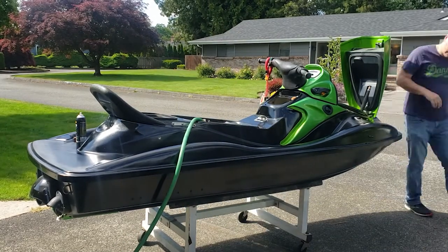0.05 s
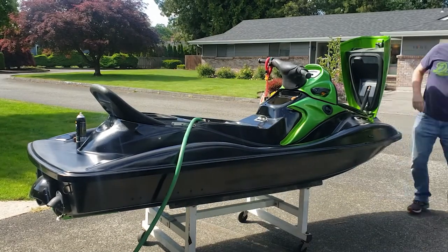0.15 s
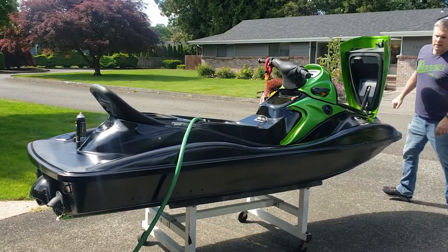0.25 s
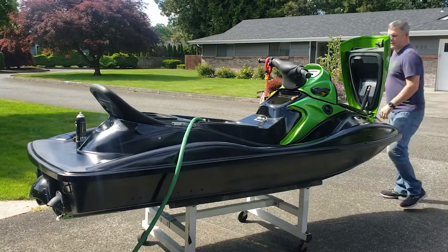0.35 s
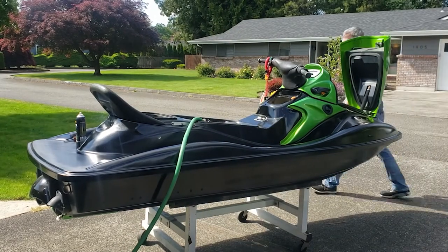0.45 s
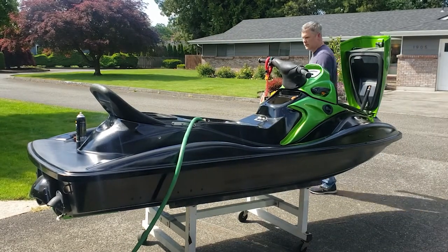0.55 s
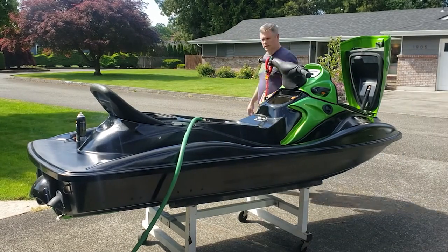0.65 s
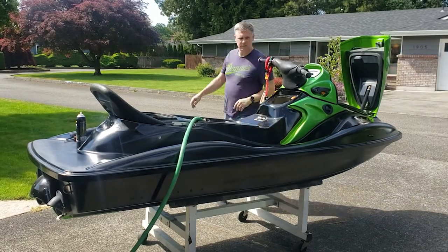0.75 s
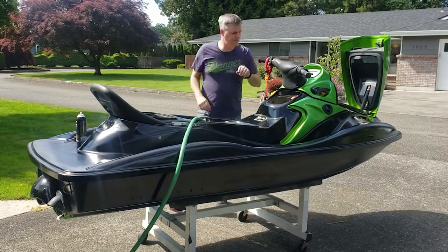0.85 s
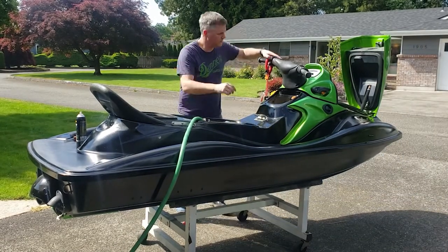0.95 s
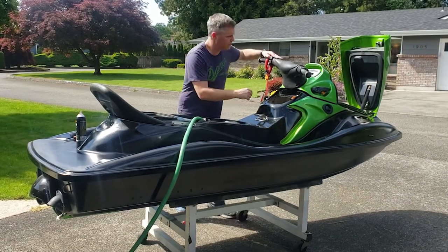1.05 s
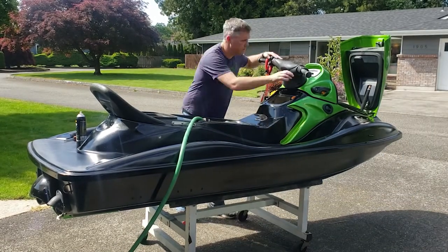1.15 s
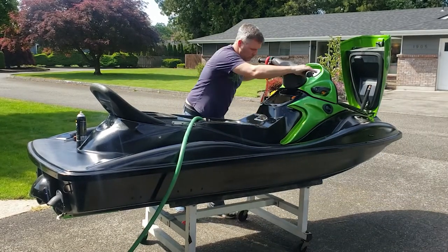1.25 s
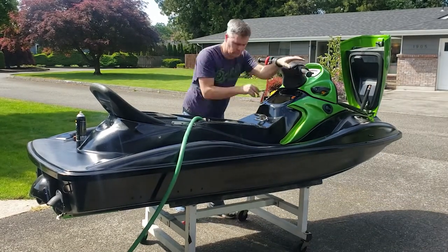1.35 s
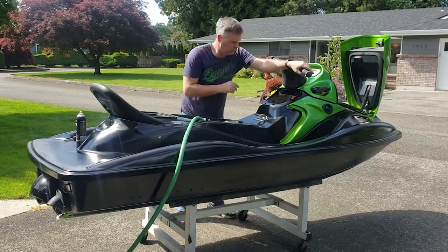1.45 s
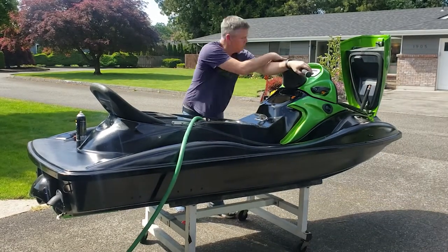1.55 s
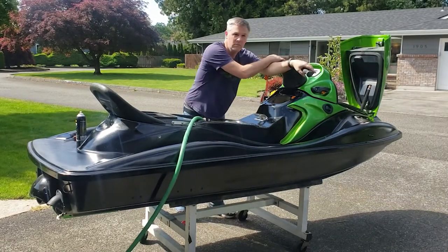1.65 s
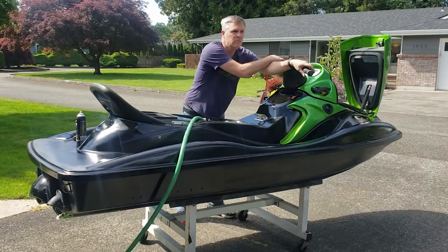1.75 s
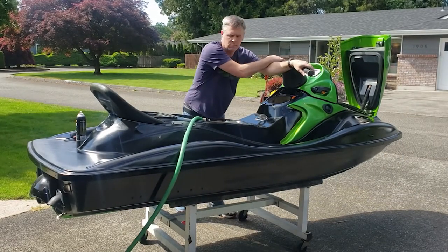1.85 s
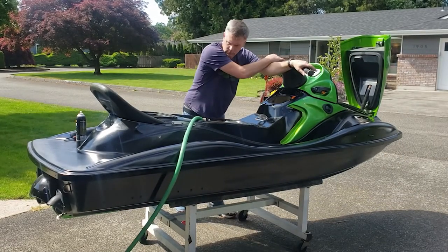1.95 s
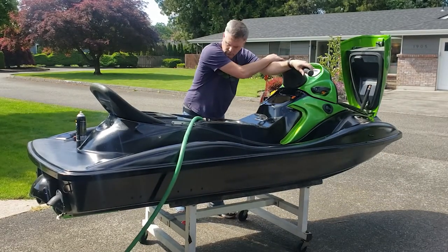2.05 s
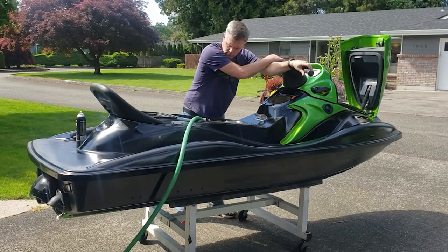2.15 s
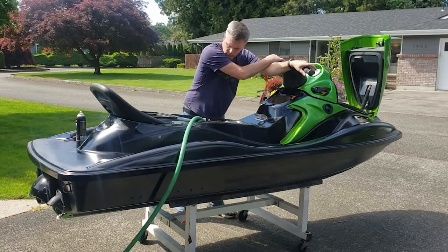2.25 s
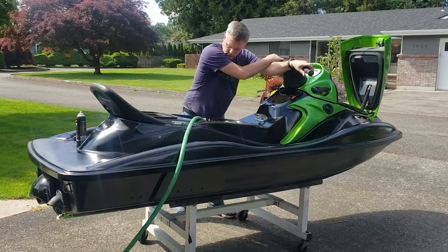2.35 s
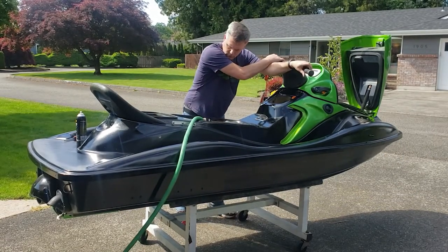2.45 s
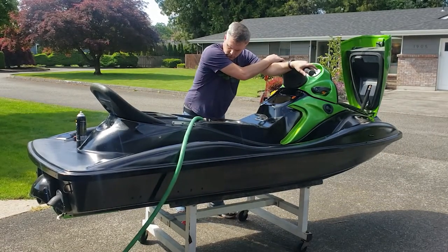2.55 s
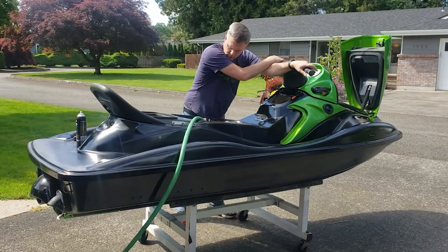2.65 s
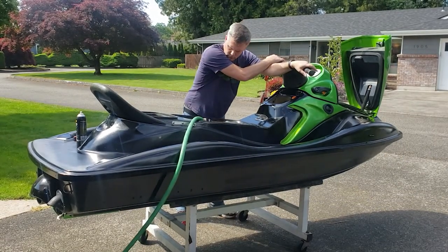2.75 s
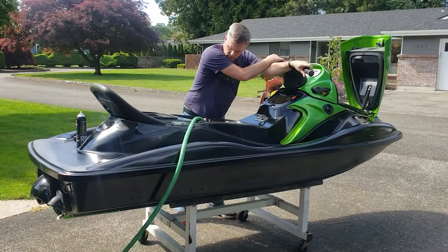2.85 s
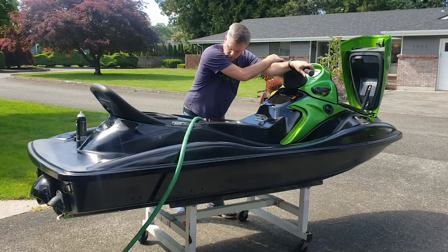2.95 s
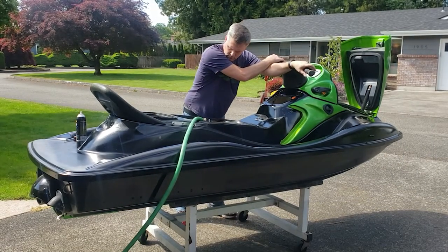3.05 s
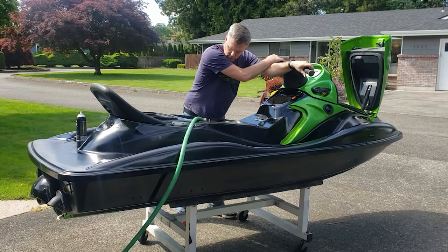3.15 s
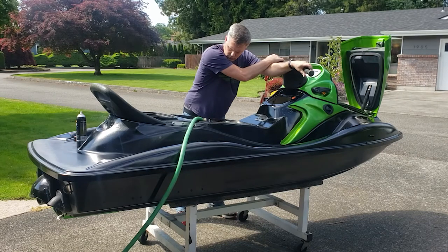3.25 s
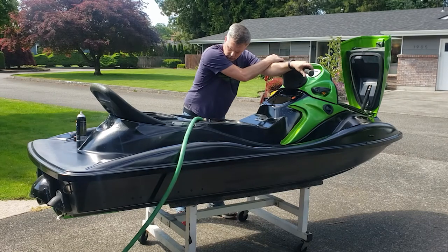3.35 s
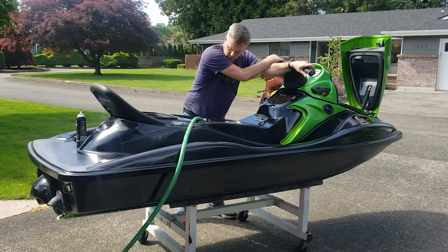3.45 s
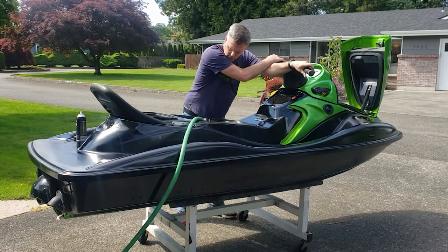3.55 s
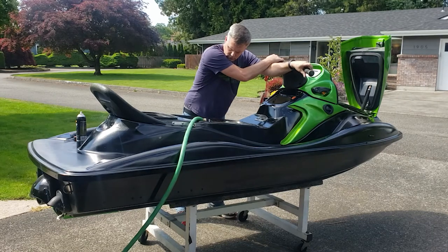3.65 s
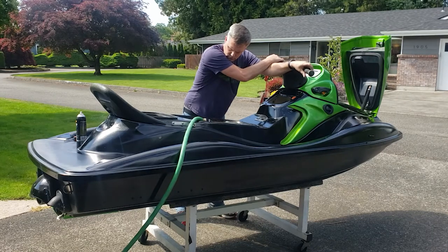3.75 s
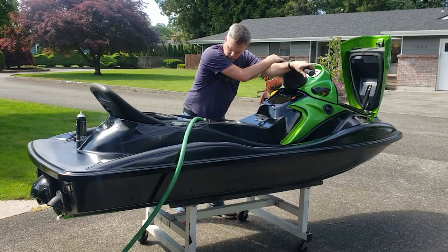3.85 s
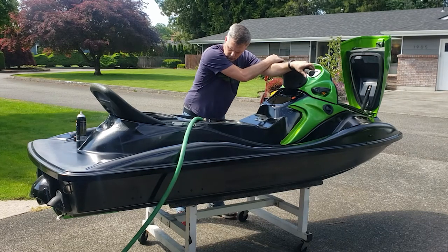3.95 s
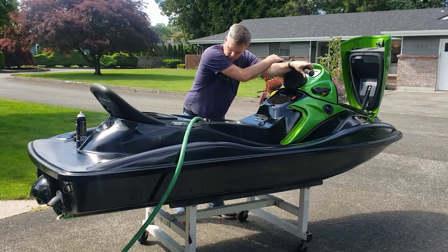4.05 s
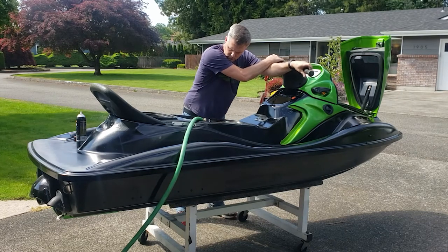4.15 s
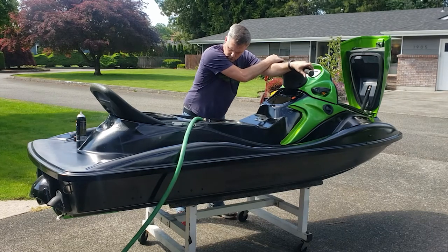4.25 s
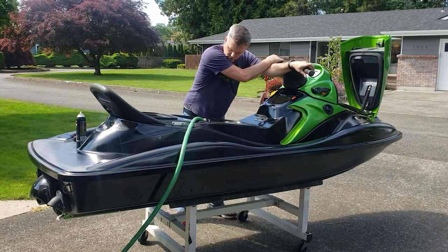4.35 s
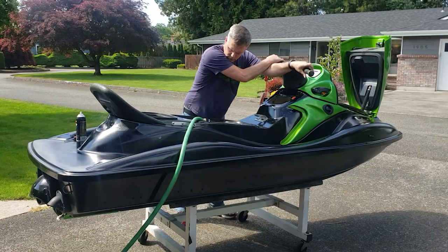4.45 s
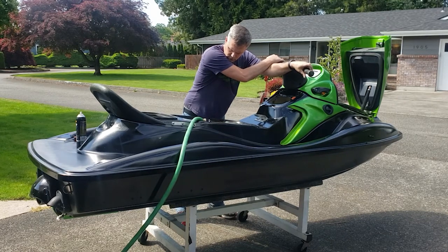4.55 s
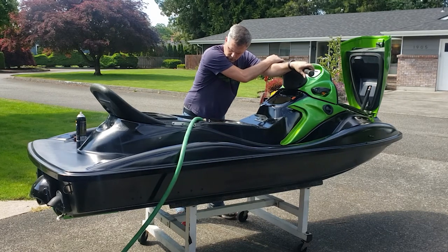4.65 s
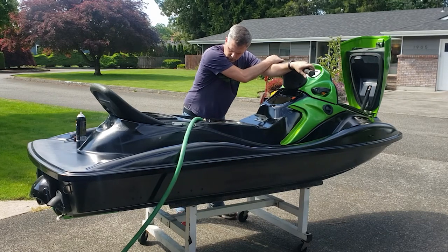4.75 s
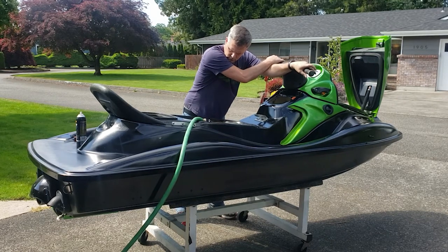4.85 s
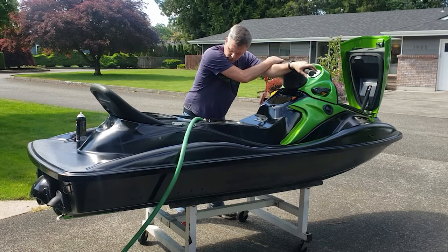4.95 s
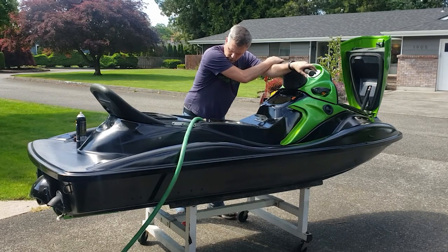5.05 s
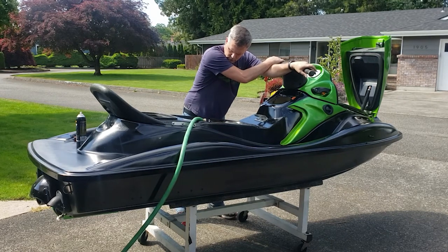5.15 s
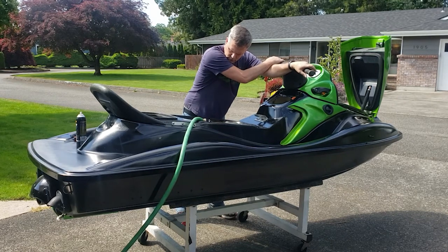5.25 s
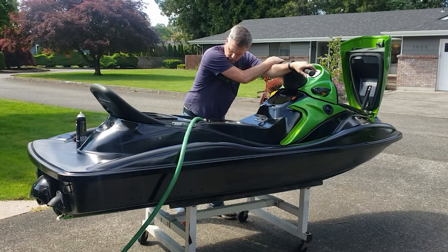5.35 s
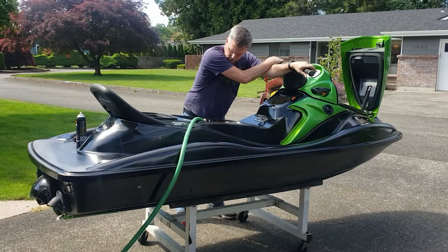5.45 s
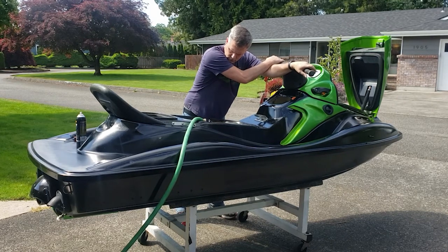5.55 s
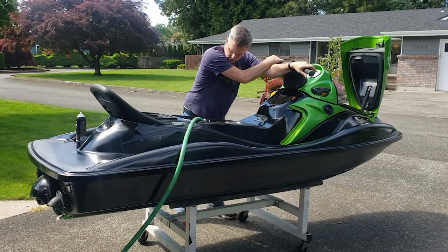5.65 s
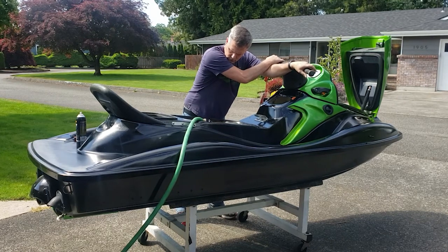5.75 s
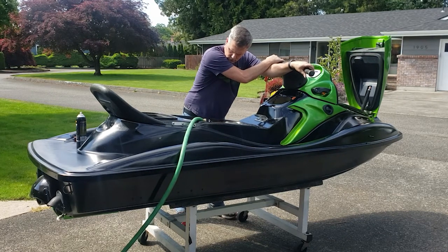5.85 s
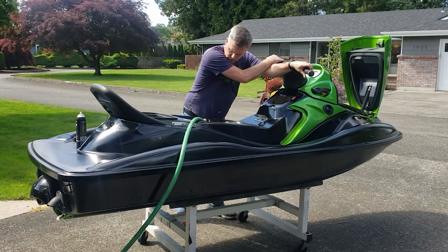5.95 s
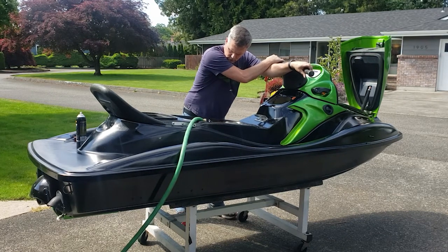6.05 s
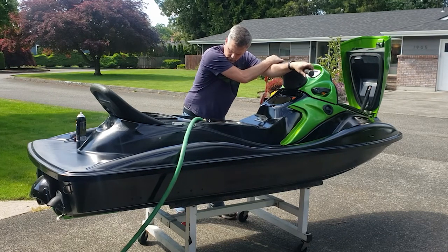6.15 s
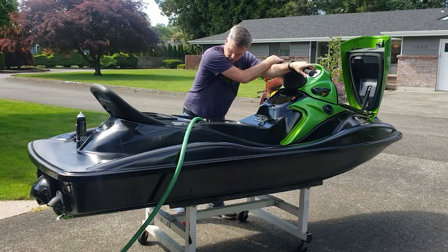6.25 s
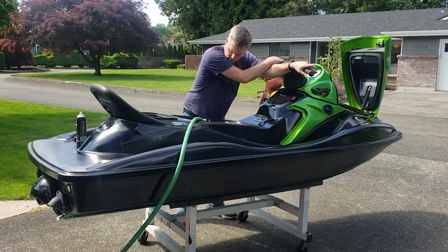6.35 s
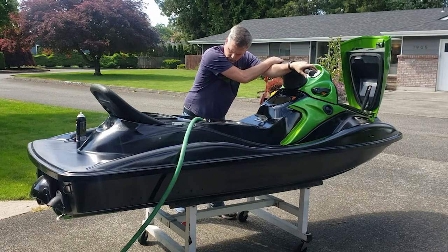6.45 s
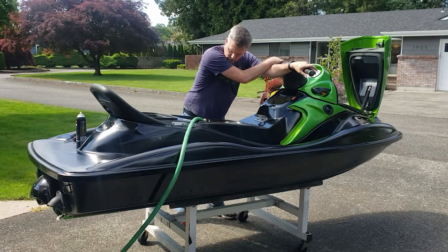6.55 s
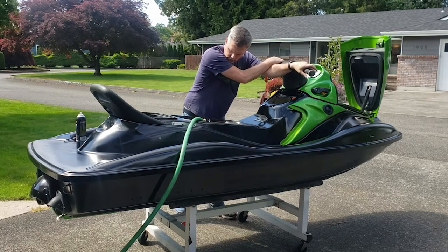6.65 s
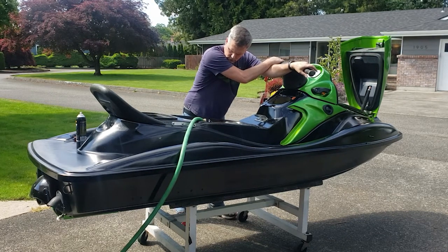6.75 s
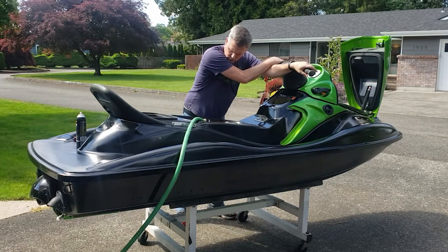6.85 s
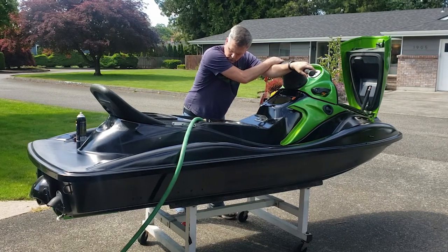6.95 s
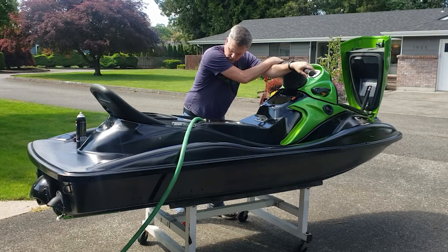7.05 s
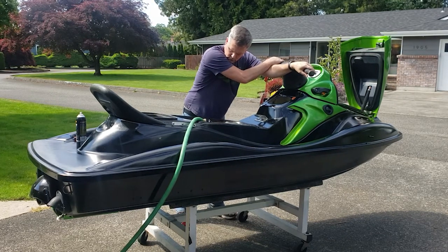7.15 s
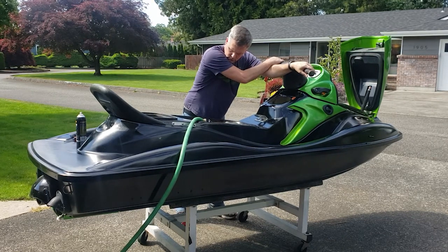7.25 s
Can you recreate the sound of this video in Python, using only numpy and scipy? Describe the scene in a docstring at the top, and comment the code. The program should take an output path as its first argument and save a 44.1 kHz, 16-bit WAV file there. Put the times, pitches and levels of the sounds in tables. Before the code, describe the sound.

Quiet outdoor rumble and shoe scuffs, then a click and sudden geared starter whine. The engine barks for a moment and quits. More cranking follows, rhythmic low puffs with gritty gears, about twenty strokes a second, interrupted by short gaps. After a clank and a brief rest, the last crank sets off hard thudding ignitions and an uneven, clattering two-stroke run. Dry, close outdoor perspective from a few metres, with low puffs of air on the microphone.

```python
"""Driveway: a three-cylinder two-stroke watercraft on a stand, started on starter fluid a few metres away.
Outdoor rumble, scuffs and a click; then geared starter whine and compression puffs booming in a hollow hull.
The engine coughs, dies, is cranked again, catches and settles to a rattling idle.
Tones and shaped noise follow crank and shaft speed; impulses ring the hull, casings, gears and pump."""
import sys
import numpy as np
from scipy import signal
from scipy.fft import rfft, irfft, next_fast_len
from scipy.io import wavfile

SR = 44100
rng = np.random.default_rng(int(sys.argv[2]) if len(sys.argv) > 2 else 0)


def master(y):
    """Save y as 16-bit WAV."""
    cut = np.clip(np.atleast_2d(y).T, -1, 1)
    pcm = np.round(cut * 32767)  # scale
    wavfile.write(sys.argv[1], SR, pcm.astype(np.int16))


N = 322364
TIME_S = np.arange(N) / SR

# Table levels are relative, before the mix gains.
# outdoor rumble and wash spectra: f/Hz, density/dB
RUMBLE_COLOUR = [(13, -52), (22, -10.5), (54, -5.5), (68, 4), (79, -3), (92, -8.5), (124, -9.5), (162, -26),
                 (174, -59.5), (214, -32.5), (232, -38), (260, -30.5), (340, -49), (570, -120)]
AIR_COLOUR = [(100, -31), (170, -4), (434, -15.5), (1070, -20), (2480, -38), (3610, -38.5), (4190, -49.5),
              (5060, -47), (5350, -48.5), (12200, -59), (15000, -62)]
# dull swells of the rumble: middle t/s, length/s, level/dB
SWELLS = [(.188, 0.064, -36.5), (.298, 0.11, -38.5), (.54, 0.083, -42.5), (.82, .1, -35), (.94, 0.078, -44)]
# puffs of air on the microphone: middle t/s, length/s, level/dB
BUFFETS = [(1.158, 0.1873, -28), (1.284, 0.59, -39), (2.062, 0.062, -26), (2.415, 0.67461, -36),
           (2.89, .1, -35), (5.1, .5, -44)]
# puff spectrum: f/Hz, density/dB
BUFFET_COLOUR = [(16, -11.5), (28, -2), (42, -6), (60, 0), (90, -16)]
# scuffs of shoes and hands: t/s, level/dB, decay/s
SCUFFS = [(.143, -59.5, 0.062), (.25, -69, 0.275), (.348, -64.5, 0.02095), (.52, -65, .02),
          (.787, -52, 0.02), (.97, -58, 0.01933)]
# scuff spectrum: f/Hz, density/dB
SCUFF_COLOUR = [(700, 12), (2000, 0), (3400, 3.5), (4500, -11), (6500, -7), (9000, -18), (15000, -26)]
# start button: down t/s, crank slows t/s, crank stops t/s, spin-up/s, puffs/dB, gears/dB, gas hiss/dB
PRESSES = [(1.056, 1.12, 1.186, .03, -31, -43.5, -51), (1.668, 1.895, 1.935, 0.04445, -30, -48, -53.5),
           (1.976, 2.62, 2.7, 0.04953, -28.5, -46.5, -53.5), (2.808, 4.95, 5.285, .035, -26, -44.5, -51.5),
           (5.602, 6.11, 6.1104, .14, -25, -44.5, -51)]
# even runs of compression strokes: first t/s, last t/s, strokes
STROKE_RUNS = [(1.065, 1.125, 2), (1.70, 1.896, 3), (1.99, 2.052, 2), (2.115, 2.28, 4), (2.335, 2.59, 7),
               (2.65, 2.65, 1), (2.83, 2.83, 1), (2.865, 3.405, 12), (3.494, 4.275, 17), (4.361, 4.943, 13),
               (5.002, 5.065, 2), (5.173, 5.225, 2), (5.611, 5.828, 4), (5.881, 6.09, 5)]
# exhaust and hull resonances: f/Hz, width/Hz, level/dB
HULL_MODES = [(58, 11.5, 1.5), (99.079, 30.7, 7.5), (159.34, 15, -12), (217.1, 35.4, 0), (290, 27, -14.5),
              (339.2, 16, -9.5), (539.95, 55, -31), (630, 126, -25.5)]
# casing resonances while cranking: f/Hz, width/Hz, level/dB
CASING_MODES = [(1191, 22, -6.5), (1420, 20, -0.5), (1579.7, 98.5, -4.5), (1905, 15, -6.5),
                (2730, 156, -2.5), (3130, 39, -26)]
# cranking spectra (breath, gear grind, gas): f/Hz, density/dB
PUFF_COLOUR = [(24, -46), (40, -41), (102, 1.5), (118, 5.5), (140, -6.5), (217, 0), (303, -2.5), (350, -3),
               (377, -10.5), (483, -14.5), (527, -15), (792, -22), (1300, -23), (1690, -69), (2860, -120)]
GRIND_COLOUR = [(350, -11.5), (600, 0.5), (1030, -3.5), (1380, -7), (1760, -4.5), (1890, 4.5), (2050, -6.5),
                (2300, -3), (2770, -9.5), (3160, -11.5), (4200, -9), (5460, -43.5), (9240, -120)]
HISS_COLOUR = [(1880, -2.5), (3200, -5.5), (3780, -5.5), (4120, -3), (4860, -8.5), (5260, -6), (6380, -8),
               (7380, -9), (7880, -9), (8940, -8.5), (9430, -16), (11500, -11.5), (13500, -18.5),
               (15100, -16), (15600, -15)]
# starter gear squeals: middle t/s, length/s, from f/Hz, to f/Hz, level/dB
SQUEALS = [(1.073, 0.057, 1750, 1862, -44), (1.106, .07, 2300, 2630, -41), (1.707, .03, 2210, 2360, -48),
           (1.787, .055, 2300, 2793, -44), (2.007, .035, 1440, 1504, -42.5),
           (2.039, 0.061, 2350, 2917, -43), (2.821, 0.027, 1530, 1460, -42.5),
           (2.846, 0.047, 2470, 2296, -43), (5.675, 0.045, 1536, 1445, -40),
           (5.742, .04, 2480, 2400, -36.5), (5.768, .045, 2250, 2000, -40), (5.821, 0.056, 2750, 2150, -42),
           (5.886, 0.0408, 2700, 2331, -40)]
# spells of firing: catches t/s, dies t/s, exhaust/dB, clatter/dB, gas hiss/dB, clatter flare/dB
SPELLS = [(1.111, 1.314, -34, -42, -46, 3.5), (6.097, 7.4, -30.5, -36.5, -43, 4)]
# crankshaft: t/s, speed/(turns/s), unevenness of firing/(0-1)
SHAFT = [(1.1, 17.3, 0.89), (1.22, 22, 0.6), (1.39, 17, 1), (6.1, 15.5, 0.08), (6.22, 21.245, 0.48),
         (6.34, 23.068, 0.61), (6.47, 20.3, 0.05), (6.55, 21.3, 0.3), (6.63, 18.998, 0.41),
         (6.75, 21.3, 0.16), (6.83, 19.9, 0.48), (6.89, 22.4, 0.24), (7.08, 21.636, 0.15),
         (7.31, 21.2, 0.08)]
# exhaust note: multiple of shaft rate, level/dB
EXHAUST_ORDERS = [(1, -30), (2, -42), (3, 3), (4, -26), (5, 3.5), (6, -4), (7, 0.5), (8, -11), (9, -13),
                  (10, -6), (11, -3), (12, 2), (13, -5.5), (14, -60), (15, -4.5), (16, -6.5), (17, -6),
                  (18, -9), (19, -30), (20, -7), (21, -8.5), (22, -46), (23, -36), (24, -34), (25, -11),
                  (26, -47), (27, -52), (28, -7.5), (29, -10.5), (30, -14)]
# running spectra (exhaust roar, clatter, gas): f/Hz, density/dB
ROAR_COLOUR = [(26, -46.5), (45, 8.5), (113, 5), (188, -2), (247, -10), (344, -19), (389, -65), (434, -8.5),
               (485, -25), (604, -32.5), (977, -21), (1200, -65), (1560, -57), (2640, -120)]
CLATTER_COLOUR = [(350, -7.5), (600, -8), (760, -9), (1160, -11.5), (1290, -7.5), (1650, -19), (1890, -1),
                  (2020, -16.5), (2670, -14), (4500, -39), (5850, -60), (9900, -120)]
GAS_COLOUR = [(2000, -14), (3300, 2), (4050, 0.5), (4600, -2), (6200, -1), (7500, -5.5), (9400, -9),
              (11500, -7), (15600, -9.5)]
# dry drive shaft and pump resonances, then their treble: f/Hz, width/Hz, level/dB
PUMP_MODES = [(1269.8, 10.76, 3.5), (1900, 8.9, 5), (1901.7, 16, -25), (2174.1, 19, 11), (2568.5, 25, 3)]
PUMP_TREBLE_MODES = [(4690, 50, -8), (5200, 70, -9), (6716, 22, 4), (7190, 70, -7), (8600, 60, -9),
                     (9250, 50, -11), (10100, 50, -11), (11260, 50, -10), (11669, 30, -6), (12780, 50, -11),
                     (13330, 50, -10)]
# notes held by the dry pump: f/Hz, level/dB
PUMP_NOTES = [(1312, -3), (1848, 2), (1911, -10.5), (6716, -4), (11669, -7.5)]
# clacks of starter drive and linkage: t/s, level/dB, decay/s
CLACKS = [(1.128, -32.5, 0.01103), (1.208, -23, 0.0065), (1.406, -45.5, 0.015), (1.524, -60.5, 0.003),
          (1.723, -38, 0.00728), (1.797, -39, 0.00735), (1.896, -45, 0.0088), (2.045, -36.5, .008),
          (2.075, -29.5, 0.0058), (3.066, -30, 0.005397), (5.168, -39.5, 0.055), (6.232, -28, .018),
          (6.3, -33.5, 0.01353)]
# clack spectrum: f/Hz, density/dB
CLACK_COLOUR = [(300, 11.5), (900, -6.5), (1800, -2.5), (2800, -13.5), (4500, -9.5), (8000, -22.5),
                (15000, -29.5)]
# hard ignitions: t/s, peak level/dB
BANGS = [(1.129, -17), (1.171, -23), (1.19, -17), (1.263, -18.5), (1.306, -17.5), (2.066, -19),
         (6.11, -15.5), (6.129, -14), (6.156, -15.5), (6.264, -19), (6.284, -20), (6.435, -16),
         (6.492, -23.5), (6.585, -16), (6.63, -18.5), (6.691, -24), (6.739, -25), (6.808, -19)]
# hull boom after an ignition: f/Hz, width/Hz, level/dB
BOOM_MODES = [(101.41, 8.417, 5.5), (135.3, 28, -3.5), (253, 80, -16)]
# gear teeth ping as weak firings throw the crank ahead of the starter: t/s, peak level/dB
PINGS = [(2.043, -29), (2.161, -34), (2.222, -36), (2.295, -31), (2.346, -32), (2.368, -34), (2.432, -34),
         (2.482, -33), (2.516, -33.5), (2.544, -35), (2.606, -38)]
# gear tooth resonances: f/Hz, width/Hz, level/dB
PING_MODES = [(1499.3, 150, -5.5), (2720, 260, -5), (2878, 190, -0.5)]
# starter pinion partials: f/Hz, level/dB, t60/s
PINION_PARTIALS = [(2923, -3.5, 0.64), (3768, -18, .35), (4214, -7.5, .3), (6320, -26, 0.432),
                   (8160, -36, .25)]
# colour of the two microphone ports: f/Hz, left minus right/dB
PORTS = [(60, 0.28), (140, 1.4015), (300, 2), (800, 1.5), (1350, 5), (1900, 2), (2300, 4), (3400, -3),
         (5000, 4.5), (6300, 3), (7400, 10.5), (8600, -6), (9800, -1), (11500, -5), (15000, -2.5)]

RUMBLE_DB, RUMBLE_FADE_DB_PER_S, RUMBLE_WANDER_DB = -43.5, -1, -0.5
AIR_NEAR_DB, AIR_DB, AIR_DROP_S, AIR_DROP_LENGTH_S = -58.5, -64, 1.0, .4
CLICK_S = .9555
BUTTON_RISE_S, COAST_POWER = 0.001892, 0.67  # starter takes hold; shape of run-down
GEARS_START_SHARE, GEARS_COAST_POWER = 0.54, 0.6727  # gear level at once; shape of gear run-down
RING_ON_S = .011  # soft end of the run-down
FULL_STROKES_PER_S = 20.5
MESH_HZ, MESH_START_SHARE, MESH_SPEED_POWER = 1425, .68, .2  # nominal pitch, share at rest, link to crank
GEAR_TONE_DB, GEAR_SAG, GEAR_FLUTTER = -3.5, .04, 0.0178  # sag, flutter: shares of pitch
GRIND_REST, CASING_REST, GAS_REST = 2.1, 0.5617, 1.57  # level between strokes, re stroke rms
THUMP_DB, HUM_DB, BREATHY_DB = -3, -3.5, -9  # cranking exhaust mix
ENGAGE_DB, ENGAGE_DECAY_S = -52, .045  # pinion slams into mesh
CATCH_S, DIE_S, EXHAUST_DIE_S = 0.0056, 0.033, .04
FLARE_AFTER_S, FLARE_WIDTH_S, FLARE_HISS_DB = 0.13, 0.0983, 1.5  # flare on starter fluid
IDLE_TURNS_PER_S = 21
CLATTER_DB_PER_TURN, HISS_DB_PER_TURN = 0.83, 1  # per turn/s above idle
RATTLE_DB, SINGING_DB, ZING_DB = -4, -8, -5.5  # pump mix
TOP_HZ, PORT_LAG_S = 15750, 0.00011


def undb(db):
    """Decibels to gain."""
    return 10 ** (np.asarray(db) / 20)


def unit(x):
    """Scale to rms 1."""
    return x / np.sqrt(np.mean(x ** 2))


def curves(rows):
    """Table columns interpolated over time."""
    times_s, *columns = np.transpose(rows)
    return [np.interp(TIME_S, times_s, column) for column in columns]


def walk(rate_hz):
    """Smooth random curve, spread near 1, rate_hz random points per second."""
    points = rng.standard_normal(4096)
    return 1.2 * np.interp(TIME_S * rate_hz % 4095, np.arange(4096), points)


def noise(colour, likeness=1):
    """Stereo noise, rms 1, shaped by (f/Hz, density/dB); likeness is the power share common to both sides."""
    size = next_fast_len(N)
    hz, db = np.transpose(colour)
    bins_hz = np.arange(size // 2 + 1) * SR / size
    shape = undb(np.interp(np.log(bins_hz + 1), np.log(hz), db, left=-90, right=-90))
    white = rng.standard_normal((3, size))
    likeness = np.clip(likeness, 0, 1)
    sides = np.sqrt(likeness) * white[0] + np.sqrt(1 - likeness) * white[1:]
    return unit(irfft(rfft(sides) * shape, size)[:, :N])


def resonate(x, modes, order=1):
    """Parallel resonances (f/Hz, width/Hz, level/dB); higher order: slower build-up, steeper sides."""
    out = 0
    for k, (hz, width_hz, db) in enumerate(modes):
        section = np.concatenate(signal.iirpeak(hz, hz / width_hz, fs=SR))
        ring = signal.sosfilt(np.tile(section, (order, 1)), x)
        out = out + (-1) ** k * undb(db) * ring  # alternate polarity
    return out


def pulses(times_s, sizes):
    """One impulse at each time."""
    samples = np.clip(np.asarray(times_s) * SR, 0, N - 1).astype(int)
    return np.bincount(samples, sizes, N)


def swell(x, rise_s, fall_s):
    """Impulses to puffs: exponential opening and decay."""
    t = TIME_S[:SR // 4]
    puff = (1 - np.exp(-t / rise_s)) * np.exp(-t / fall_s)
    return signal.oaconvolve(x, puff)[:N]


def bump(middle_s, length_s):
    """Smooth cos-squared rise and fall around a moment."""
    return np.cos(np.pi * np.clip((TIME_S - middle_s) / length_s, -.5, .5)) ** 2


def gate(on_s, off_s, rise_s, fall_s):
    """Exponential attack, hold and release."""
    attack = 1 - np.exp(-np.maximum(TIME_S - on_s, 0) / rise_s)
    return attack * np.exp(-np.clip((TIME_S - off_s) / fall_s, 0, 30))


def outdoors():
    """Uneven low rumble and puffs of air under a soft neighbourhood wash."""
    swells, puffs = (sum(undb(db) * bump(s, length_s) for s, length_s, db in rows)
                     for rows in (SWELLS, BUFFETS))
    rumble_db = RUMBLE_DB + RUMBLE_FADE_DB_PER_S * TIME_S + RUMBLE_WANDER_DB * walk(14)
    rumble = (undb(rumble_db) + swells) * noise(RUMBLE_COLOUR)
    air_db = np.interp(TIME_S, [AIR_DROP_S, AIR_DROP_S + AIR_DROP_LENGTH_S], [AIR_NEAR_DB, AIR_DB])
    air = undb(air_db + walk(6.8)) * noise(AIR_COLOUR, 0.5928)
    return rumble + puffs * noise(BUFFET_COLOUR) + air


def bursts(rows, colour, likeness):
    """Noise hits with exponential decay: t/s, level/dB, decay/s."""
    envelope = np.zeros(N)
    for s, db, decay_s in rows:
        tail = envelope[int(s * SR):][:SR // 2]  # a view: adds in place
        tail += undb(db) * np.exp(-TIME_S[:len(tail)] / decay_s)
    return envelope * noise(colour, likeness)


def scuffs():
    """Shoes and hands rub: short shaped noise."""
    return bursts(SCUFFS, SCUFF_COLOUR, 0.19)


def plastic_click(db=-38):
    """Small plastic part snaps into place at the handlebar: a noise tick excites three resonances."""
    snap = bursts([(CLICK_S, db, .0018)], SCUFF_COLOUR, 0.508)
    return .5 * snap + resonate(snap, [(3631, 162.3, 10), (6300, 550, 6), (8100, 420, -12)])


def starter_effort(times_s):
    """Gains of puffs, gears, hiss, and mesh pitch: build-up after each press, run-down with the crank."""
    gaps_s = np.diff(times_s)
    turning = gaps_s < .15  # skip pauses between runs
    middles_s = times_s[:-1] + gaps_s / 2
    speed = np.interp(TIME_S, middles_s[turning], 1 / gaps_s[turning]) / FULL_STROKES_PER_S
    puff, gears, hiss, spin = np.zeros((4, N))
    for down_s, slows_s, stops_s, spin_up_s, puff_db, gears_db, hiss_db in PRESSES:
        age_s = np.maximum(TIME_S - down_s, 0)
        left_s = RING_ON_S * np.logaddexp(0, (stops_s - TIME_S) / RING_ON_S)  # time left to turn
        coast = np.clip(left_s / (stops_s - slows_s), 0, 1)
        pressed = 1 - np.exp(-age_s / BUTTON_RISE_S)
        held = pressed * coast ** COAST_POWER
        up_to_speed = 1 - np.exp(-age_s / spin_up_s)
        spin = np.where(TIME_S >= down_s, up_to_speed * np.sqrt(coast), spin)
        puff = puff + held * up_to_speed ** 2 * undb(puff_db)
        gear_share = GEARS_START_SHARE + (1 - GEARS_START_SHARE) * up_to_speed
        gears = gears + pressed * coast ** GEARS_COAST_POWER * gear_share * undb(gears_db)
        hiss = hiss + held * up_to_speed * undb(hiss_db)
    mesh_share = MESH_START_SHARE + (1 - MESH_START_SHARE) * spin
    return puff, gears, hiss, MESH_HZ * mesh_share * speed ** MESH_SPEED_POWER


def cranking():
    """Each compression loads the starter gears, then lets a puff of unburnt gas into the exhaust."""
    times_s = np.concatenate([np.linspace(first, last, int(count)) for first, last, count in STROKE_RUNS])
    puff, gears, hiss, mesh_hz = starter_effort(times_s)
    strength = undb(rng.standard_normal((len(times_s), 3)).T)  # 1 dB spread
    equal = np.ones(len(times_s))
    steady = (TIME_S > 2.9) & (TIME_S < 4.9)

    def even(x):
        """Rms 1 over steady cranking."""
        return x / np.sqrt(np.mean(x[..., steady] ** 2))

    load = even(swell(pulses(times_s - .010, strength[0]), rise_s=0.0027, fall_s=0.01977))
    blow = even(swell(pulses(times_s, strength[1]), rise_s=0.001369, fall_s=0.019))

    # port opens just after top dead centre; hull swells with each thump
    thump = even(resonate(pulses(times_s + 0.0067329, np.sqrt(strength[2])), HULL_MODES, order=2))
    # hull air hums on between strokes
    hum_modes = [(103.76, 17.5, 9.0), (244.7, 24.0, -9), (538.0, 28.69, -17)]
    hum = even(resonate(pulses(times_s + 0.00697, equal), hum_modes, order=2))
    breathy = even(2 + blow) * noise(PUFF_COLOUR, 0.96)
    exhaust = undb(THUMP_DB) * thump + undb(HUM_DB) * hum + undb(BREATHY_DB) * breathy

    # starter slows against each compression and races away after it
    sag = even(swell(pulses(times_s, equal), rise_s=.012, fall_s=0.011))
    pitch_hz = mesh_hz * (1.02 - GEAR_SAG * sag + GEAR_FLUTTER * walk(700))
    mesh = 2 * np.pi * np.cumsum(pitch_hz) / SR
    partials = 0.68 * np.sin(mesh) + np.sin(2 * mesh) + 0.071 * np.sin(3 * mesh)
    whine = unit(partials) * undb(2 * walk(400))
    teeth = undb(2.75 * walk(600))
    grind = even(teeth * (GRIND_REST + load)) * noise(GRIND_COLOUR, 0.66)
    casing = even(resonate(teeth * (CASING_REST + load) * noise(GRIND_COLOUR, 0.5446), CASING_MODES))
    starter = undb(GEAR_TONE_DB) * whine * load + grind + undb(-1.5) * casing

    gas = even(undb(1.3 * walk(400)) * (GAS_REST + blow)) * noise(HISS_COLOUR, 0.12)
    zing_modes = [(4903, 87, -6.0), (7410, 94, 7), (9200, 130, -12.5)]
    zing = even(resonate(blow * noise(HISS_COLOUR, 0.6), zing_modes))
    return puff * exhaust + gears * starter + hiss * (undb(1.5) * gas + undb(-12) * zing)


def clacks():
    """Pinion slams into mesh at each press; starter drive and linkage clack: decaying noise."""
    engaging = [(press[0], ENGAGE_DB, ENGAGE_DECAY_S) for press in PRESSES]
    return bursts(engaging + list(CLACKS), CLACK_COLOUR, 0.54)


def squeals():
    """Starter gears squeal: short, rough sine glides."""
    out = np.zeros(N)
    rough = undb(3 * walk(300))
    waver = 1 + .025 * walk(600)
    for s, length_s, from_hz, to_hz, db in SQUEALS:
        span = np.flatnonzero(np.abs(TIME_S - s) < length_s / 2)
        pitch_hz = np.linspace(from_hz, to_hz, len(span)) * waver[span]
        phase = 2 * np.pi * np.cumsum(pitch_hz) / SR
        out[span] += undb(db) * np.hanning(len(span)) * np.sin(phase)
    return out * rough


def firing_effort(turn_hz):
    """Gains of exhaust, clatter, hiss: engine catches, flares, and rattles more with speed."""
    exhaust, clatter, hiss = np.zeros((3, N))
    above = turn_hz - IDLE_TURNS_PER_S
    for catches_s, dies_s, exhaust_db, clatter_db, hiss_db, flare_db in SPELLS:
        alive = gate(catches_s, dies_s, CATCH_S, DIE_S)
        flare = np.exp(-((TIME_S - catches_s - FLARE_AFTER_S) / FLARE_WIDTH_S) ** 2)
        exhaust = exhaust + gate(catches_s, dies_s, CATCH_S, EXHAUST_DIE_S) * undb(exhaust_db)
        clatter = clatter + alive * undb(clatter_db + flare_db * flare + CLATTER_DB_PER_TURN * above)
        hiss = hiss + alive * undb(hiss_db + FLARE_HISS_DB * flare + HISS_DB_PER_TURN * above)
    return exhaust, clatter, hiss


def running():
    """Three firings a turn drive the exhaust note; the dry pump rattles and gas hisses from the pipe."""
    turn_hz, uneven = curves(SHAFT)
    exhaust, clatter, hiss = firing_effort(turn_hz)
    turns = np.cumsum(turn_hz) / SR

    # unequal cylinders: note repeats once a turn; random phase per order softens the turn's pulse
    phases_rad = 1.62 * rng.standard_normal(len(EXHAUST_ORDERS))
    note = unit(sum(undb(db) * np.cos(2 * np.pi * k * turns + phase)
                    for (k, db), phase in zip(EXHAUST_ORDERS, phases_rad)))
    firing = unit(5.0 + np.exp(-(3 * turns % 1) / 0.7))
    roar = firing * noise(ROAR_COLOUR, 0.94)
    misfires = undb(6 * uneven * walk(60))
    even_share = np.sqrt(np.clip(1 - uneven ** 2, 0, 1))
    pipe = undb(3.0) * note * even_share * misfires + undb(4) * uneven * roar
    # stumbling, over-rich firing makes the hull drone
    hull_ring = unit(resonate(note, [(115.8, 11.0, 0)]))
    drone = undb(14.0) * np.clip(uneven - .2, 0, .25) * hull_ring

    knocks = unit(firing * undb(1.7126 * walk(300))) * noise(CLATTER_COLOUR, 0.57)
    # drive backlash: pump rings in uneven spurts
    spurts = undb(2.5 * walk(45))
    pump = unit(resonate(firing * spurts * noise(CLATTER_COLOUR, 0.61), PUMP_MODES))
    # pump sings once the shaft turns evenly
    singing = unit(sum(undb(db + 4 * walk(28)) * np.sin(2 * np.pi * hz * TIME_S + 1.3 * walk(60))
                       for hz, db in PUMP_NOTES))
    settled = np.clip(1.3 - 1.6 * uneven, 0, 1)
    ringing = settled * (undb(RATTLE_DB) * pump + undb(SINGING_DB) * singing)
    metal = undb(0.5) * knocks + ringing

    zing = undb(ZING_DB) * unit(resonate(undb(4 * walk(25)) * noise(GAS_COLOUR, .5), PUMP_TREBLE_MODES))
    gas = unit(firing * undb(1.5 * walk(200))) * noise(GAS_COLOUR, 0.14)
    return exhaust * (pipe + drone) + clatter * metal + hiss * (undb(1) * gas + settled * zing)


def strike(rows, ring):
    """Peak-normalised ring at each (t/s, level/dB)."""
    times_s, db = np.transpose(rows)
    return signal.oaconvolve(pulses(times_s, undb(db)), ring / np.abs(ring).max())[:N]


def bangs():
    """A charge of starter fluid goes off and the hull booms: low-passed modal impulse response."""
    boom = resonate(pulses([0], [1.]), BOOM_MODES)[:SR // 2]
    boom = signal.sosfilt(signal.butter(2, 420, fs=SR, output="sos"), boom)
    return strike(BANGS, boom)


def pings():
    """Gear teeth knock together across their backlash and ring."""
    return strike(PINGS, resonate(pulses([0], [1.]), PING_MODES, order=2)[:SR // 10])


def pinion(start_s=5.1821, db=-48):
    """Starter pinion drops out of mesh and rings on: decaying sines."""
    t = np.maximum(TIME_S - start_s, 0)
    return sum(undb(db + mode_db - 60 * t / t60_s) * np.sin(2 * np.pi * hz * t)
               for hz, mode_db, t60_s in PINION_PARTIALS)


def scene():
    """Sum of outdoor sounds, starter and engine."""
    small = scuffs() + plastic_click() + clacks()
    starter = cranking() + squeals() + pings() + pinion()
    engine = running() + bangs()
    return outdoors() + small + starter + engine


def record(dry):
    """Two microphone ports: left hears first, each has its own colour, top is cut."""
    size = next_fast_len(N + 1000)
    hz = np.arange(size // 2 + 1) * SR / size
    port_hz, port_db = np.transpose(PORTS)
    balance_db = np.interp(np.log(hz + 1), np.log(port_hz), port_db)
    left = undb(balance_db / 2)
    right = undb(-balance_db / 2) * np.exp(-2j * np.pi * hz * PORT_LAG_S)
    heard = irfft(rfft(dry, size) * np.array([left, right]), size)[:, :N]
    return signal.sosfilt(signal.ellip(10, .2, 70, TOP_HZ, fs=SR, output="sos"), heard)


dry = scene()
out = record(dry)
master(out)
```